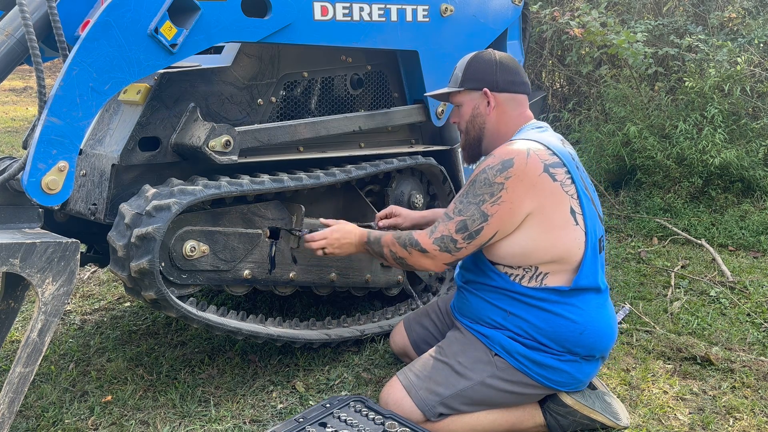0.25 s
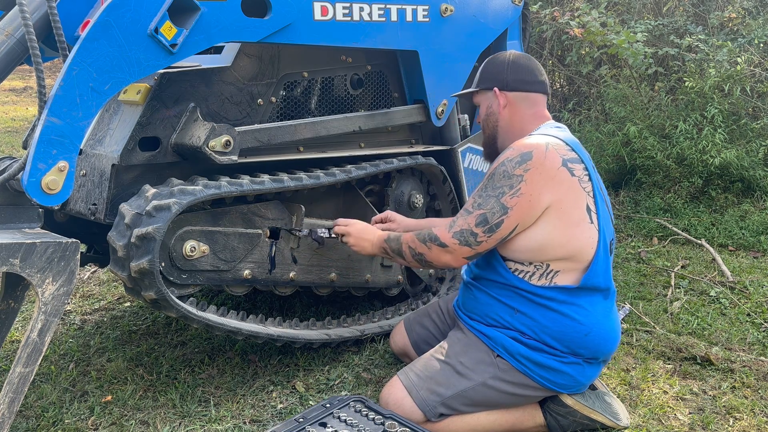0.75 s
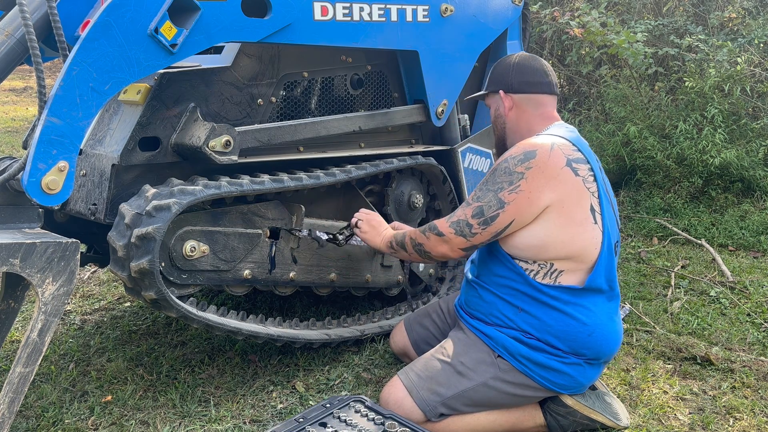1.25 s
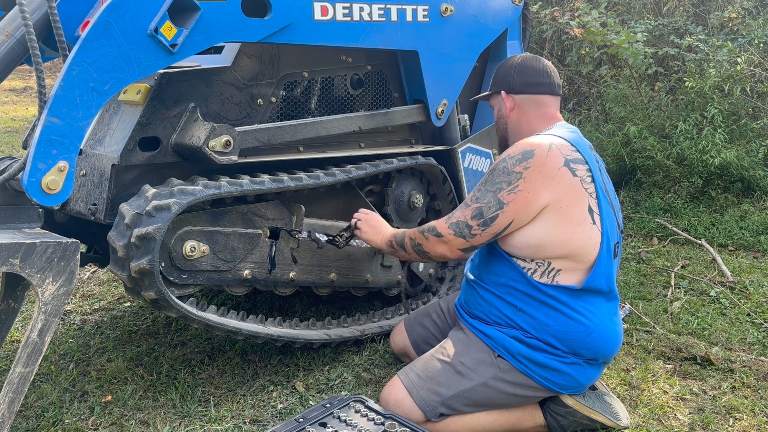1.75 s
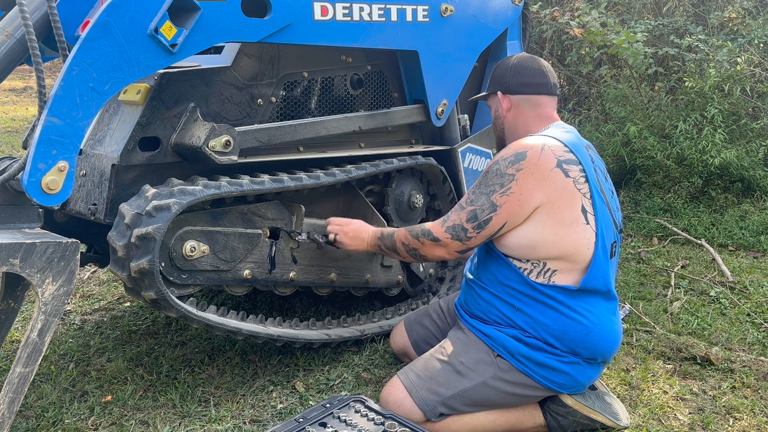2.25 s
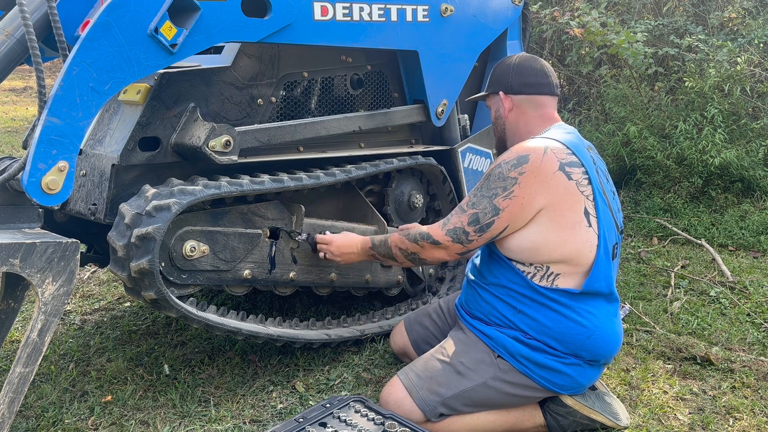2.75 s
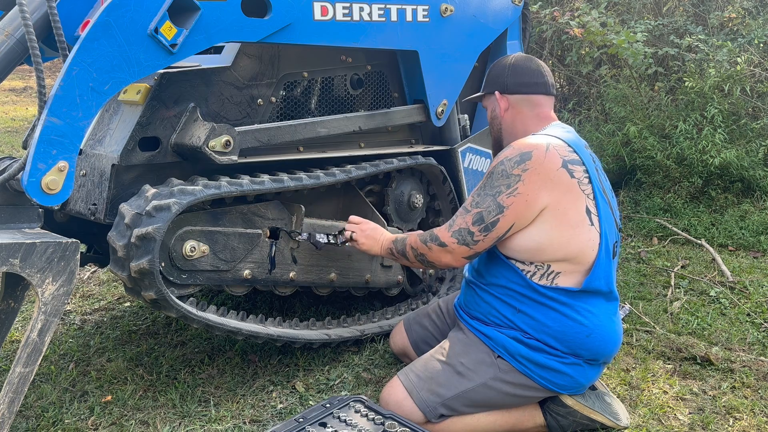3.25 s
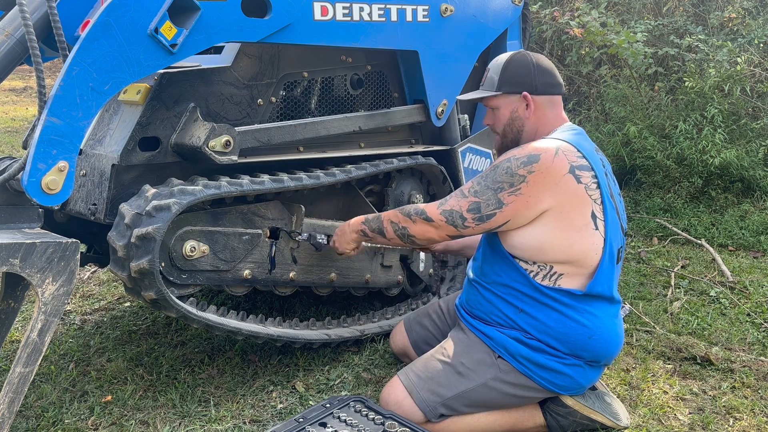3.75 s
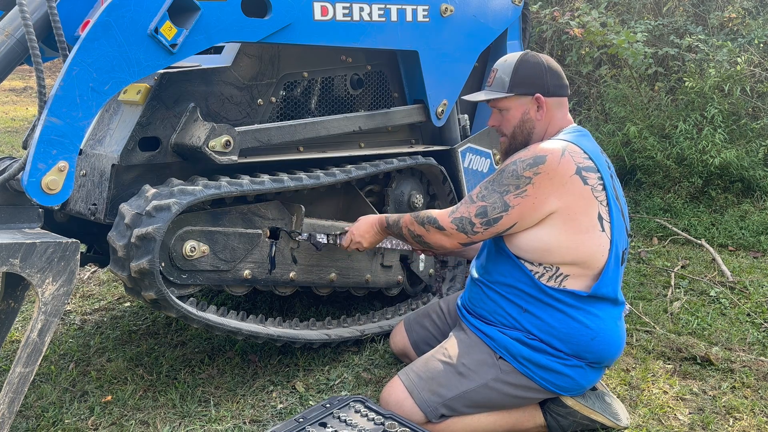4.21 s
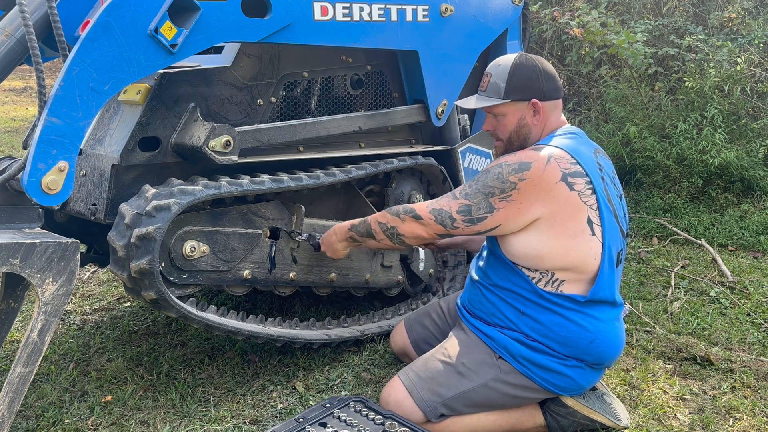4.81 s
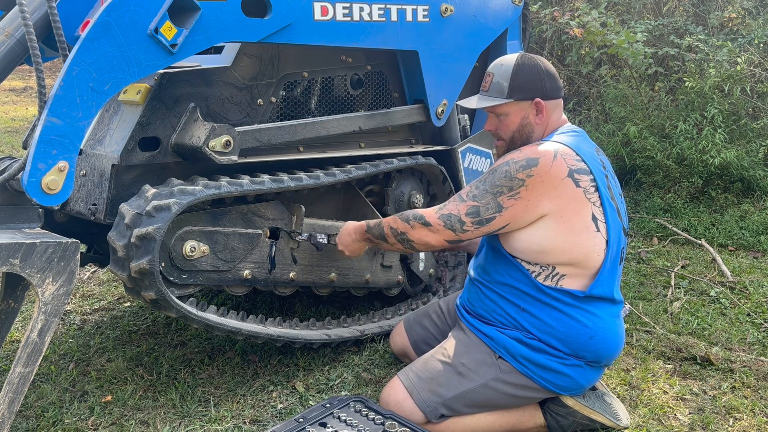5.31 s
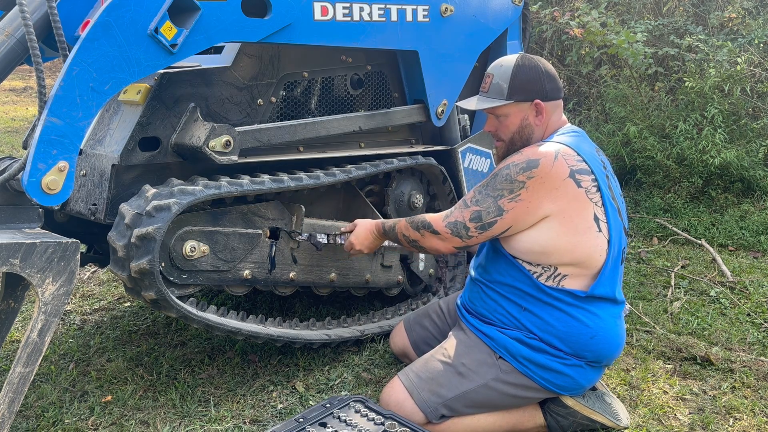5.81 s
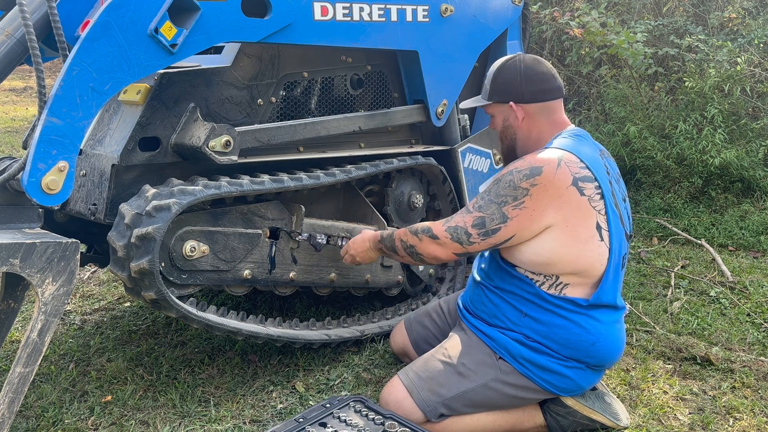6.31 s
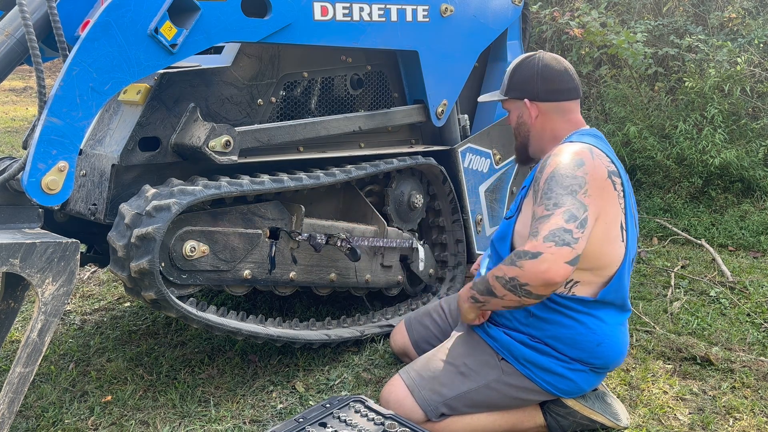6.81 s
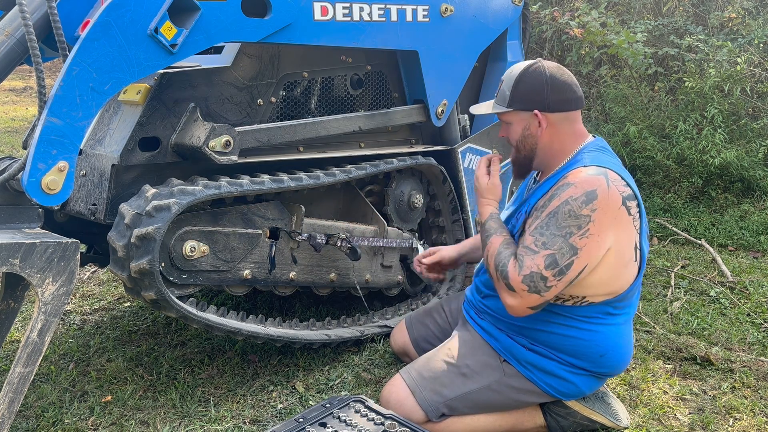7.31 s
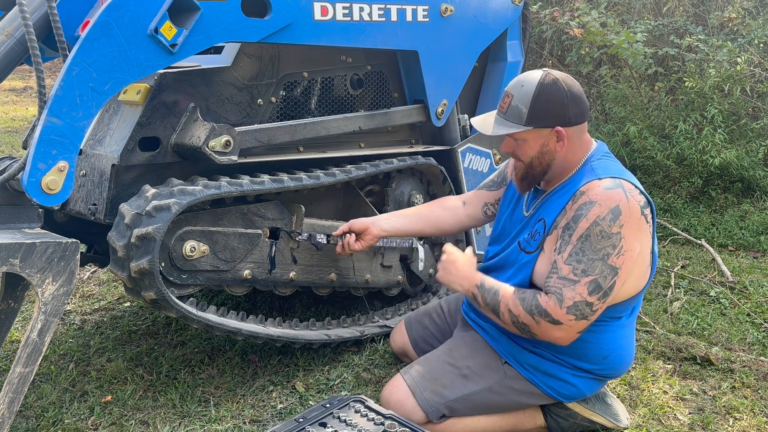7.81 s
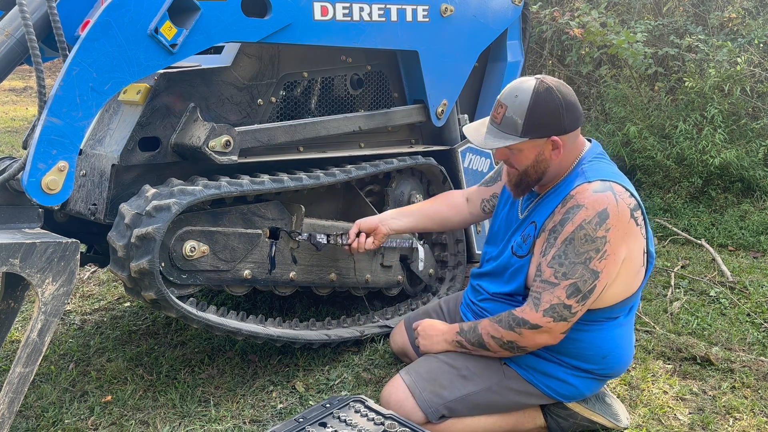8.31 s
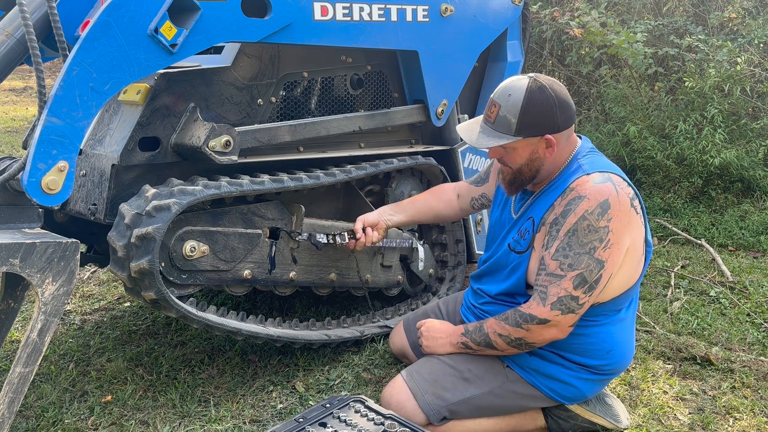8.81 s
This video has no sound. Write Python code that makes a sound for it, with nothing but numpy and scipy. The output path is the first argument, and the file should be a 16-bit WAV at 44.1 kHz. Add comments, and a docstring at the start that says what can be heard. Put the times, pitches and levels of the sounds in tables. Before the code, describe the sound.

Outdoors in a grassy meadow, a hand ratchet tightens against a machine's steel frame about two metres from a stereo microphone. Crisp, uneven, bright clicks come in rapid strokes for three seconds with small rubs between, then a tiny dry squeak and scattered duller knocks. After a pause, a few faint handling ticks follow. Insects hiss steadily up high; far motors hum low, with soft wind buffets.

```python
"""Insects near 8 kHz, a higher pulsing singer and two far motor hums open the scene in a meadow.
A hand ratchet is then cranked on a parked machine's steel undercarriage, two metres from the microphone ports:
bursts of uneven slips ring steel modes for knocks and rubs, and a gliding tone with its octave squeaks.
The insects are filtered noise and one wavering tone; the motors are stacks of sines.
Wind gusts and the far wash of traffic and leaves are coloured noise."""
import sys
import numpy as np
from scipy import signal
from scipy.fft import rfft, irfft
from scipy.io import wavfile
from scipy.ndimage import uniform_filter1d

SR = 44100
rng = np.random.default_rng(int(sys.argv[2]) if len(sys.argv) > 2 else 0)


def unload_wav(signal):
    """Save mono or channel-first audio to the path in sys.argv[1] as 16-bit WAV at rate SR, clipped to [-1, 1]."""
    wavfile.write(
        sys.argv[1],
        SR,
        np.round(np.clip(np.atleast_2d(signal).T, -1, 1) * 32767).astype(np.int16),
    )


N = 399545

# pawl and handle knocks: (time [s], level in 2.2-6 kHz [dB], treble relative to it [dB],
# loudest mode [Hz], length within 7 dB of the peak [ms])
KNOCKS = [(.147, -66, -18, 943, 12), (.165, -61.5, -14, 2980, 6.8), (0.574, -60, 13, 2800, 12),
          (0.6511, -40.5, 20, 4400, 4.8), (0.709, -42.5, 16, 2830, 4.1), (0.7133, -34.5, 9.5, 4080, 1.8),
          (0.7848, -41.5, 20, 5360, 6), (.822, -46.5, -4, 2900, 3.2), (1.042, -56.5, -4, 4800, 32),
          (1.086, -40, 20.5, 4530, 4.8), (1.111, -48, 5, 5030, 4), (1.131, -39, 18.5, 4600, 4.7),
          (1.342, -56, 8, 5800, 7.4), (1.394, -39.5, 15.5, 3900, 6.5), (1.443, -39, 13.5, 4660, 9.2),
          (1.4876, -70, 30, 4800, 4.6), (1.589, -57.5, -4, 4300, 12), (1.6571, -38.5, 14, 2930, 6.6),
          (1.714, -38, 15, 5750, 6.2), (1.799, -55, 9, 5850, 3.5), (1.8097, -45, 12.5, 5770, 4.5),
          (1.832, -55.5, -1, 2950, 9.3), (1.912, -61, 6, 5850, 3), (1.926, -57, 7, 4100, 2.8),
          (1.9805, -66, 13, 4020, 8), (2.003, -39, 14, 5200, 5.5), (2.0565, -41.5, 15.5, 4970, 8.7),
          (2.1096, -42.5, 15.5, 4700, 8.5), (2.2308, -54.5, 12, 4630, 11), (2.305, -36.5, 15, 4900, 4.4),
          (2.351, -41.5, 19, 5400, 1.9), (2.358, -33.5, 16, 5430, 1.6), (2.502, -53, 12.5, 5100, 6.4),
          (2.5215, -46, 0, 5000, 2.8), (2.586, -39, 16, 5770, 6.5), (2.641, -38, 10.5, 3350, 6.3),
          (2.811, -61, 18.5, 6070, 5), (2.955, -59, 4, 4020, 5.2), (2.977, -44.5, 5.5, 2880, 5),
          (2.996, -44, 9.5, 4500, 2.8), (3.0274, -40.5, 10.5, 5500, 4.3), (3.352, -51.5, 17, 5500, 1.5),
          (3.3583, -42, -10, 4530, 1.4), (3.364, -45.5, 2, 4500, 2.1), (3.471, -60.5, -13, 4500, 7.5),
          (3.714, -57, 2, 5500, 2.9), (4.15, -45, 10.5, 4530, 3.3), (4.1674, -43.5, 3.5, 4500, 2.9),
          (4.2556, -47.5, 12.5, 2850, 7.8), (4.301, -55.5, -8, 4580, 3.5), (4.507, -53, 6, 4600, 4.6),
          (4.527, -61, 5, 2430, 7.7), (4.6, -62, -10, 3000, 4.5), (4.65, -71, -6, 1770, 12),
          (4.699, -51, -22, 3380, 1.8), (4.7073, -51.5, -25, 3470, 13), (4.739, -49, 2, 5900, 4.6),
          (4.7546, -35.5, 8, 3456, 3.8), (4.76, -37.5, 2, 4470, 4.7), (4.8752, -56.5, -2, 3400, 4.3),
          (4.907, -54, -5, 4400, 6), (4.912, -74, -12, 930, 14), (4.764, -76, -10, 930, 10),
          (5.669, -47, -1, 4930, 3.4), (5.701, -52, 5.5, 4960, 6.8), (5.743, -41.5, 10.5, 4900, 4),
          (5.8604, -42, 4, 2600, 2.3), (6.062, -64.5, -2, 2750, 11), (7.652, -60, -15, 3470, 5.6),
          (7.67, -55, -3, 4840, 13), (7.682, -51.5, -22, 3500, 6.3), (7.733, -68.5, -15, 1980, 15),
          (7.817, -56.5, -20, 1940, 3.8), (7.819, -52, -14, 2880, 4.6), (7.838, -69, -15, 1900, 4),
          (7.867, -66.5, -15, 2000, 12), (7.911, -61.5, -19, 2040, 5.2), (7.94, -50, -9, 4870, 5.2),
          (7.9453, -44, -17, 4800, 4.8), (7.95, -52, -20, 2060, 4.8)]
# edges of the bands in which a knock is levelled: frame, low, main, upper, treble [Hz]
KNOCK_BANDS_HZ = [420, 1450, 2150, 6000, 9500, 16550]
# ratchet and frame modes: (nominal pitch [Hz], width before damping [Hz], relative level [dB])
STEEL_MODES = [(520, 60, -2), (750, 40, 2), (930, 32, 2), (1110, 45, 1), (1300, 35, 2), (1750, 90, 1),
               (2040, 90, 0), (2430, 120, 7), (2850, 130, 6), (3200, 130, 4), (3500, 150, 5),
               (4020, 150, 2), (4580, 160, 2), (5030, 200, 1), (5850, 200, -4), (6820, 200, 3),
               (7900, 300, 6), (9170, 290, 6), (11900, 300, 4), (13100, 300, 7), (14400, 370, 7)]
# metal rubbing between the knocks: (centre time [s], swell to 1/e [s], level [dB], loudest mode [Hz])
RUBS = [(0.697, 0.021, -53.5, 2870), (0.723, 0.028, -52, 2880), (0.804, 0.028, -49.5, 4760),
        (0.967, 0.38, -68.5, 3150), (1.214, 0.31, -66.5, 3170), (1.316, 0.024, -59.5, 2300),
        (1.38, 0.02, -47, 4050), (1.464, 0.071, -56, 4020), (1.681, 0.08, -55.5, 2900),
        (2.169, 0.1, -65, 3750), (1.94, 0.042, -59, 3980), (2.038, 0.046, -48.5, 2880),
        (2.344, 0.067, -58, 2860), (2.491, 0.0089, -56, 5030), (2.53, 0.039, -60, 4020),
        (2.62, 0.05, -53, 2880), (2.718, 0.26, -69.5, 3130), (2.805, 0.021, -55, 3330),
        (3.33, 0.016, -53, 4520), (4.724, 0.034, -58, 2100), (4.89, 0.036, -62, 3400),
        (7.73, 0.04, -68, 3150), (7.782, 0.055, -70, 2880), (7.932, 0.033, -61.5, 2040)]
# dry squeak of the ratchet head: (time [s], pitch [Hz], level [dB])
SQUEAK = [(3.322, 7040, -48), (3.33, 7210, -39), (3.345, 7190, -36.5), (3.356, 7300, -42)]
# tone colour of the insect chorus: (frequency [Hz], relative level [dB])
CHORUS_COLOUR = [(5200, -92), (6300, -29), (7000, -9), (7600, 3), (8000, 3.5), (8500, -7), (9000, -12.5),
                 (9800, -66), (11000, -89)]
# high pulsing insect: (time [s], level [dB])
HIGH_INSECT_LEVEL = [(0, -69.5), (.8, -65), (2.4, -64.5), (3.1, -65.5), (4.85, -69), (5.05, -73),
                     (5.3, -68.5), (5.55, -66), (6.7, -66.5), (6.9, -72), (7.1, -69.5), (7.3, -69),
                     (7.85, -66), (8.4, -69), (9.06, -63.5)]
# tone colour of the high insect: (frequency [Hz], relative level [dB])
HIGH_INSECT_COLOUR = [(8000, -60), (9500, -7), (10700, -9), (12500, -6), (14000, -2), (15700, 0),
                      (15800, -70)]
# wavering motor: (time [s], level of harmonics 1, 2, 3 and 4 [dB])
MOTOR_HARMONICS = [(0.0, -53, -72, -88, -82.5), (0.61, -56.5, -70, -63.5, -90), (0.91, -62, -80, -79, -93),
                   (1.97, -45, -66, -72.5, -70.5), (2.34, -48, -61, -57, -80), (2.73, -54.5, -72, -68, -80),
                   (3.03, -52.5, -60, -63.5, -79), (3.18, -55, -66, -88, -85), (3.25, -63, -64, -57, -74),
                   (3.53, -78, -61.5, -64.5, -80), (4.01, -48, -61.5, -59, -80),
                   (4.46, -45, -70, -57.5, -83), (4.79, -52.5, -67, -74, -77), (4.94, -54.5, -74, -61, -87),
                   (5.9, -67, -58.5, -55.5, -79), (6.61, -54.5, -58.5, -84.5, -81),
                   (6.97, -57.5, -59.5, -64.5, -76), (7.69, -51, -62, -67, -73.5),
                   (7.95, -68, -53.5, -66.5, -75), (8.12, -55.5, -54, -79, -82), (8.55, -48, -50, -62, -72),
                   (9.06, -44, -50.5, -58.5, -74)]
# faint upper lines of that motor: (multiple of its pitch, level [dB])
MOTOR_FAINT = [(6, -89), (7, -90), (9, -91)]
# steadier engine: (multiple of the firing rate, level [dB])
ENGINE_LINES = [(2, -60), (3, -63), (4, -67.5), (5, -56.5), (6, -58), (7, -72), (8, -67.5), (10, -76.5),
                (11, -76), (13, -78)]
# gusts on the ports: (time [s], level [dB])
GUSTS = [(.649, -65), (1.614, -44.5), (1.956, -54), (2.25, -51), (2.496, -53), (2.97, -50), (3.268, -59),
         (5.646, -59), (5.998, -49.5), (6.3, -61), (7.131, -49)]
# tone colour of far traffic and leaves: (frequency [Hz], relative level [dB])
AIR_COLOUR = [(25, -34), (45, -6.5), (140, -6), (230, -14), (430, -27), (850, -30), (1250, -32),
              (1700, -31), (2200, -38), (3000, -36.5), (4000, -41), (5700, -50), (8000, -83)]
# swell of that wash: (time [s], level [dB])
AIR_LEVEL = [(0, -55.5), (2, -53.5), (4.5, -55.5), (6.5, -57.5), (9.06, -56.5)]
# how alike the wash is in both ports: (frequency [Hz], likeness [0-1])
AIR_LIKENESS = [(60, 0.42), (300, 0.54), (700, 0.31), (1400, 0.17), (3000, 0.89), (6000, 0.85)]
# level difference of the ports: (frequency [Hz], left minus right [dB])
PORT_BALANCE = [(40, .4), (200, 2), (600, 4.2), (1300, 2.5), (2400, 1), (8000, .2)]
# phase difference of the ports: (frequency [Hz], lead of the left [rad])
PORT_PHASE = [(100, 0), (340, .4), (1700, -.35), (3400, .6), (5400, -.15), (6900, 0), (8000, -.8),
              (10000, -3.14), (12700, -6.28), (15550, -9.42), (16800, -10.2)]

# the part of a knock spent swelling: bright, loud pawl chatter builds up,
# while duller blows and softer ticks start sharply
CHATTER_RISE, BLOW_RISE = 0.51, 0.17
CHATTER_TREBLE_DB, CHATTER_DB = 10, -43  # a knock above both is chatter
# low band over the main one: at a -45 dB knock, slope with level, lift when a low mode is struck
LOW_DB, LOW_DB_PER_DB, LOW_MODE_DB = -22, 0.25, 25.5
# frame ring over the low band; more for the deepest modes, less for knocks whose loudest mode is near 2 kHz
FRAME_DB, DEEP_MODE_DB, NEAR_2K_FRAME_DB = 4, 10.5, -14
FRAME_LATE_S = 0.00403  # the frame answers a knock a little late
# once the quick strokes end the handle rings freer and the slower blows shake more of the frame
LOOSE_S, LOOSE_LOW_DB = 3.2, 2
RUB_RING_DB, LOOSE_RING_DB = 10, 21  # lift of a rub's loudest mode, before and after that
# later blows sound hollow between the mode groups; width in natural log of frequency
HOLLOW_HZ, HOLLOW_WIDTH, HOLLOW_DB = 3750, .15, -12
CHORUS_DB, CHORUS_LIKENESS = -52.5, .72
CRICKET_HZ, CRICKET_DB, PULSE_HZ = 8860, -71.5, 56.0
MOTOR_HZ, MOTOR_WAVER_HZ, ENGINE_HZ = 94.57, 0.2523, 24.52  # motor pitch, its drift, firing rate
GUST_S = 0.14  # a gust is down to 1/e this far from its peak
TOP_HZ = 16650


def ratchet(size=8192, echo_db=-9, echo_t60=0.068):
    """Knocks and rubs, and what the machine frame scatters back as a short decaying noise."""
    direct = knocks() + rubs()
    decay = undb(-60 * np.arange(size) / SR / echo_t60)
    scatter = rng.standard_normal((2, size)) * decay
    scatter = signal.lfilter([1], [1, -.5], scatter)  # darken it
    scatter = scatter * undb(echo_db) / np.sqrt(np.sum(scatter ** 2) / 2)
    return direct + signal.fftconvolve(direct[None], scatter, axes=1)[:, :N]


def knocks(size=8192, upper_db=-4.5, skirt_db=-22, skirt_ms=1.9):
    """Each knock is a burst of slips that swells and dies, inside a fainter rounded skirt of chatter."""
    s, db, treble_db, loudest_hz, length = np.transpose(KNOCKS)[:, :, None]
    chatters = (treble_db > CHATTER_TREBLE_DB) & (db > CHATTER_DB)
    share = np.where(chatters, CHATTER_RISE, BLOW_RISE)
    rise, fall = share * length, (1 - share) * length

    ms = (np.arange(size) - size // 4) / SR * 1000
    swell, die = -ms / np.maximum(rise, .2), ms / np.maximum(fall, .2)
    shape = undb(-7 * np.where(ms < 0, swell, die))
    skirt_length = skirt_ms * np.where(ms < 0, 2 * share, 2 - 2 * share)
    shape = shape + undb(skirt_db) * np.exp(-(ms / skirt_length) ** 2)

    chance = rng.standard_normal((len(KNOCKS), size + size // 32 + len(STEEL_MODES)))
    ring_db = np.clip(9 - .4 * treble_db, 3, 13)  # soft, dull blows ring more and crack less
    hz, body = steel(loudest_hz, chance, size,
                     crack_db=1 - .6 * ring_db, favoured_db=ring_db, damping=1.2)
    off_hollow = abs(np.log(loudest_hz / HOLLOW_HZ)) > HOLLOW_WIDTH
    dip = np.exp(-(np.log((hz + 1) / HOLLOW_HZ) / HOLLOW_WIDTH) ** 2)
    body = body * undb(HOLLOW_DB * ((s > LOOSE_S) & off_hollow) * dip)
    # a low mode rings with little above it
    body = body / np.sqrt(1 + (loudest_hz < 2200) * (hz / 3000) ** 6)
    rung = slips(shape, chance, slip_db=4.0) * body

    low_db = LOW_DB + LOW_DB_PER_DB * (db + 45)
    low_db = low_db + LOW_MODE_DB * (loudest_hz < 2500) + LOOSE_LOW_DB * (s > LOOSE_S)
    near_2k_db = NEAR_2K_FRAME_DB * (loudest_hz < 2200)
    frame_db = low_db + FRAME_DB + np.where(loudest_hz < 1200, DEEP_MODE_DB, near_2k_db)
    bands_db = (frame_db, low_db, 0, upper_db + 0.55 * treble_db, treble_db)
    burst = 0
    for lo, hi, band_db in zip(KNOCK_BANDS_HZ, KNOCK_BANDS_HZ[1:], bands_db):
        band = rung / np.sqrt((1 + (lo / (hz + 1)) ** 6) * (1 + (hz / hi) ** 24))
        if lo == KNOCK_BANDS_HZ[0]:
            band = band * np.exp(-2j * np.pi * hz * FRAME_LATE_S)
        burst = burst + sized(band, shape, db + band_db)
    return place(s[:, 0], irfft(burst, size), size // 4)


def rubs(size=16384):
    """Rough sliding excites the same modes, mostly for longer and in coarser slips."""
    s, length, db, loudest_hz = np.transpose(RUBS)[:, :, None]
    shape = np.exp(-((np.arange(size) - size // 2) / SR / length) ** 2)
    chance = rng.standard_normal((len(RUBS), size + size // 32 + len(STEEL_MODES)))
    ring_db = np.where(s < LOOSE_S, RUB_RING_DB, LOOSE_RING_DB)
    hz, body = steel(loudest_hz, chance, size, crack_db=1.5, favoured_db=ring_db, damping=.8)
    dull = np.sqrt((1 + (1600 / (hz + 1)) ** 4) * (1 + (hz / 8500) ** 4))  # thin both ends
    rung = slips(shape, chance, slip_db=2.5, count=128) * body / dull
    return place(s[:, 0], irfft(sized(rung, shape, db), size), size // 2)


def steel(loudest_hz, chance, size, crack_db, favoured_db, damping, scatter_db=0.5):
    """Resonances of the steel at each contact; where it lands favours one mode and scatters the others."""
    hz = np.arange(size // 2 + 1) * SR / size
    body = undb(crack_db) * hz ** 2 / (hz ** 2 + 1300 ** 2)  # the bare crack has little bass
    for k, (mode_hz, width, mode_db) in enumerate(STEEL_MODES):
        width = width * damping
        near = np.exp(-(np.log(loudest_hz / mode_hz) / .05) ** 2)  # 1 at the favoured mode
        detune = 1 + .035 * (1 - near) * chance[:, k, None]  # grip and load detune it
        mode_hz = mode_hz * (loudest_hz / mode_hz) ** near * detune
        uneven_db = scatter_db * (1.5 - near) * chance[:, -1 - k, None]
        strike = undb(mode_db + favoured_db * near + uneven_db)
        body = body + strike * 1j * hz * width / (mode_hz ** 2 - hz ** 2 + 1j * hz * width)
    return hz, body


def slips(shape, chance, slip_db, count=32):
    """Stick-slip noise in slips of count samples and uneven size under an envelope, as a spectrum."""
    size = shape.shape[1]
    slip_sizes = np.repeat(chance[:, size:size + size // count], count, axis=1)
    return rfft(shape * undb(slip_db * slip_sizes) * chance[:, :size])


def squeak():
    """Stick-slip whistle with its octave, rough in level."""
    hz, db = over_time(SQUEAK)
    t = np.arange(N) / SR
    gate = np.clip(np.minimum(t - SQUEAK[0][0], SQUEAK[-1][0] - t) / .004, 0, 1)  # 4 ms fades
    whistle = tone(hz) + undb(-3) * tone(2 * hz)
    return gate * undb(db + 2.0 * walk(400)) * whistle


def insects():
    """A smooth noise chorus, a thin cricket tone on its flank, and a higher noise singer that pulses."""
    chorus_db = CHORUS_DB + .5 * walk(3.16) + 0.85 * walk(40)
    chorus = undb(chorus_db) * noise(CHORUS_COLOUR, CHORUS_LIKENESS)
    cricket = undb(CRICKET_DB + 2.0 * walk(55)) * tone(CRICKET_HZ + 25 * walk(30))
    beat = np.cumsum(PULSE_HZ + .6 * walk(2)) / SR % 1  # position within each pulse, 0-1
    pulses = level(1 + 1.2 * np.exp(-((beat - .5) / .09) ** 2), 0)
    high = undb(over_time(HIGH_INSECT_LEVEL)[0]) * pulses * noise(HIGH_INSECT_COLOUR, 1.0)
    return chorus + cricket + high


def motors():
    """Two far harmonic hums; air paths make every line waver."""
    hz = MOTOR_HZ + MOTOR_WAVER_HZ * walk(1.5)
    hum = 0
    for multiple, db in enumerate(over_time(MOTOR_HARMONICS), start=1):
        line_hz = multiple * (hz + 0.594 * walk(7))
        hum = hum + undb(db + 1.57 * walk(3.5) + 1.6 * walk(12)) * tone(line_hz)
    for multiple, db in MOTOR_FAINT:
        hum = hum + undb(db + 3.5 * walk(2.5)) * tone(multiple * (hz + .5 * walk(7)))
    firing = ENGINE_HZ * (1 + 0.00425 * walk(1.501))
    for multiple, db in ENGINE_LINES:
        hum = hum + undb(db + 2.0 * walk(5.4)) * tone(multiple * firing)
    return hum


def wind():
    """Short low gusts buffet the ports: bass noise under bell-shaped swells."""
    t = np.arange(N) / SR
    push = sum(undb(db) * np.exp(-((t - s) / GUST_S) ** 2) for s, db in GUSTS)
    colour = [(15, -37), (30, -8.0), (50, 2.0), (90, 1.5), (160, -21.0), (400, -67.0)]  # (Hz, dB)
    return push * noise(colour, 0.96)


def air():
    """Distant broadband wash of traffic and leaves: coloured noise that drifts in level."""
    drift_db = over_time(AIR_LEVEL)[0] + 0.37 * walk(2.64)
    return undb(drift_db) * noise(AIR_COLOUR, over_hz(AIR_LIKENESS, N))


def undb(db):
    """dB to gain."""
    return 10 ** (np.asarray(db) / 20)


def level(x, db):
    """Scale to an rms level."""
    return x * undb(db) / np.sqrt(np.mean(x ** 2))


def over_time(table):
    """Table columns as curves, one value a sample."""
    s, *columns = np.transpose(table)
    return [np.interp(np.arange(N) / SR, s, c) for c in columns]


def over_hz(table, size):
    """A (Hz, value) table on the bins of a transform, along log frequency."""
    hz, value = np.transpose(table)
    bins_hz = np.arange(size // 2 + 1) * SR / size
    return np.interp(np.log(bins_hz + 1), np.log(hz), value)


def noise(colour, likeness):
    """Coloured stereo noise of rms 1; likeness 1 is the same left and right."""
    mid, side = rfft(rng.standard_normal((2, N)))
    like = np.clip(likeness, 0, 1)
    pair = np.sqrt(1 + like) * mid + np.sqrt(1 - like) * side * np.array([[1], [-1]])
    return level(irfft(pair * undb(over_hz(colour, N)), N), 0)


def walk(rate):
    """Random levels held 1 / rate s and slewed twice; spread near 1."""
    k = int(SR / rate)
    steps = np.repeat(rng.standard_normal(N // k + 1), k)
    return 1.242 * uniform_filter1d(uniform_filter1d(steps, k), k)[:N]


def tone(hz):
    """A sine of rms 1 on a pitch curve, from a random phase."""
    return np.sqrt(2) * np.sin(2 * np.pi * (np.cumsum(hz) / SR + rng.random()))


def sized(spectrum, shape, db):
    """Scale each spectrum so that its envelope peaks at db rms."""
    energy = np.sum(shape ** 2, axis=1, keepdims=True) * shape.shape[1] / 2
    return spectrum * undb(db) * np.sqrt(energy / np.sum(abs(spectrum) ** 2, axis=1, keepdims=True))


def place(s, waves, lead):
    """Lay each wave down so that its sample number lead falls on its time."""
    size = waves.shape[1]
    out = np.zeros(N + 2 * size)  # room for waves that overhang either end
    for start, wave in zip((s * SR).astype(int) + size - lead, waves):
        out[start:start + size] += wave
    return out[size:size + N]


def scene():
    """Everything that reaches the two ports."""
    return ratchet() + squeak() + insects() + motors() + wind() + air()


def record(dry):
    """The two ports differ in level and turn the treble's phase against each other; the top is cut."""
    # each port takes half of the difference
    half = undb(over_hz(PORT_BALANCE, N) / 2) * np.exp(.5j * over_hz(PORT_PHASE, N))
    ports = irfft(rfft(dry) * np.array([half, 1 / half]), N)
    top_cut = signal.ellip(10, .2, 80, TOP_HZ, fs=SR, output="sos")
    return signal.sosfilt(top_cut, ports)


dry = scene()
out = record(dry)
unload_wav(out)
```